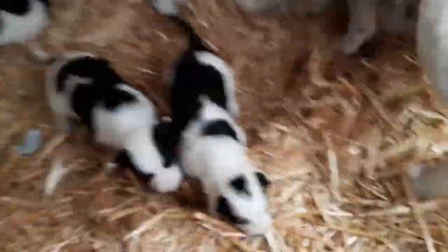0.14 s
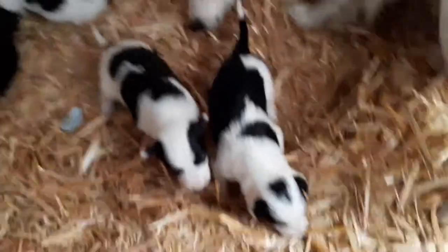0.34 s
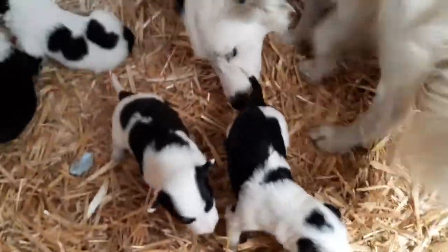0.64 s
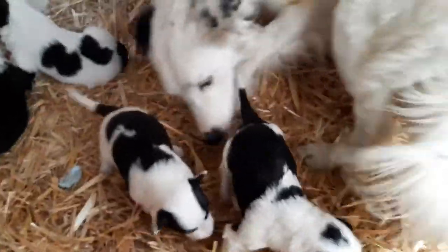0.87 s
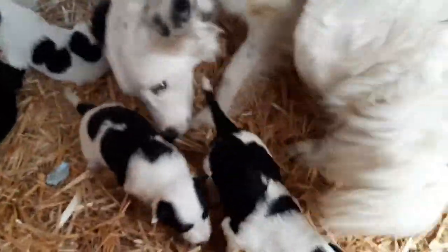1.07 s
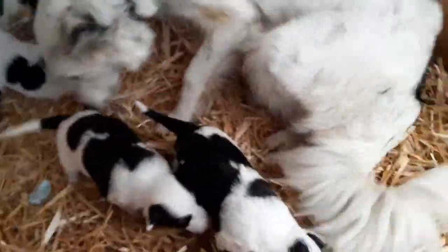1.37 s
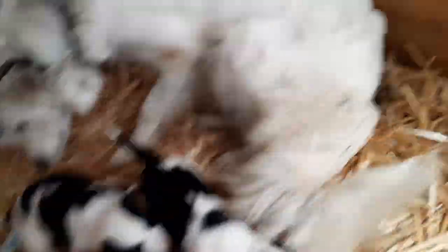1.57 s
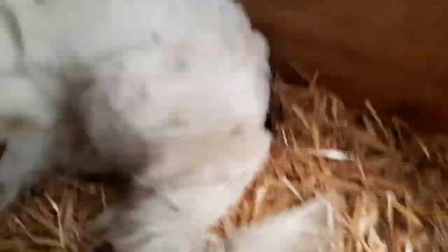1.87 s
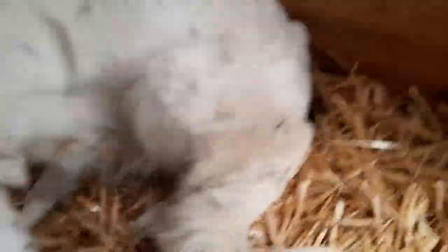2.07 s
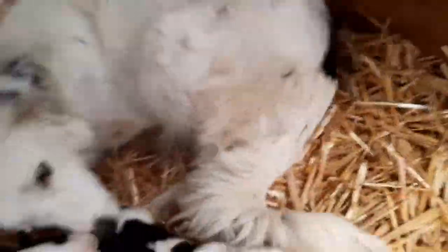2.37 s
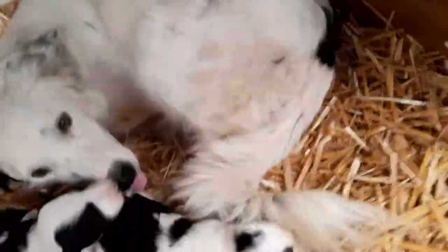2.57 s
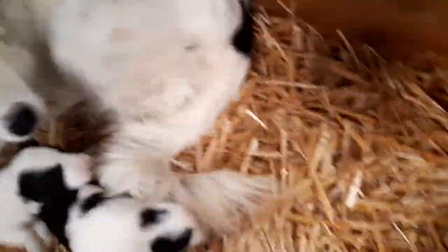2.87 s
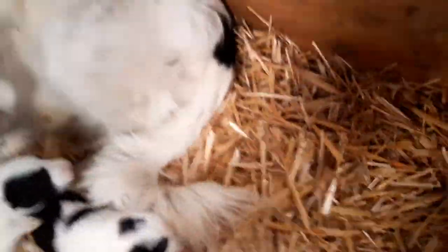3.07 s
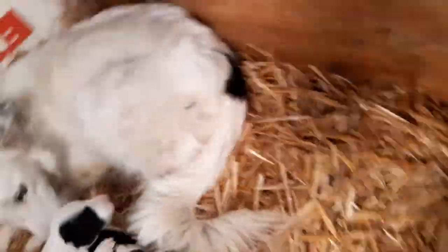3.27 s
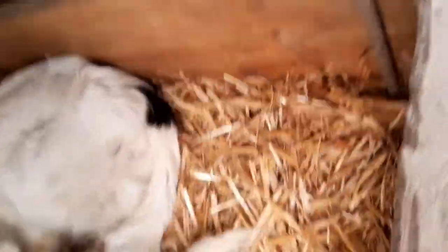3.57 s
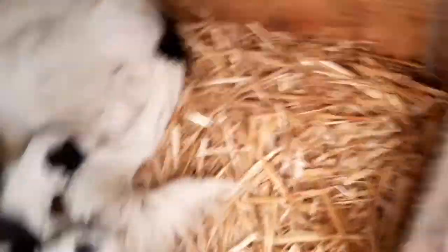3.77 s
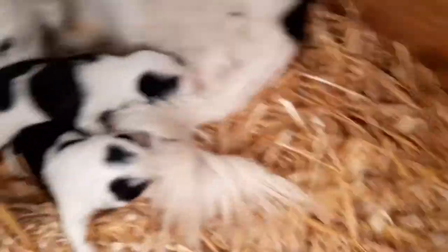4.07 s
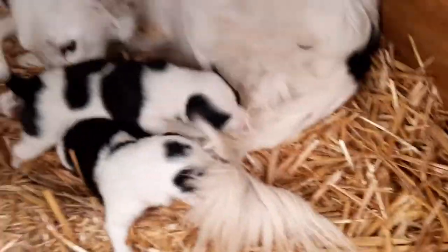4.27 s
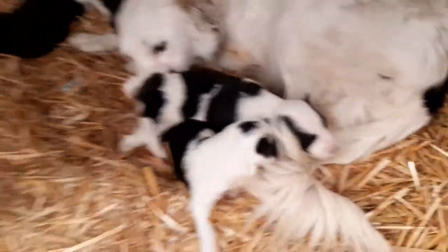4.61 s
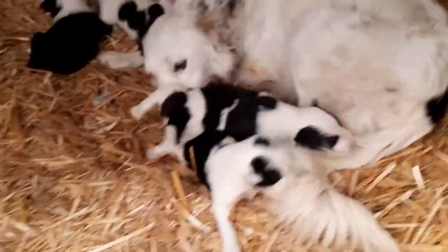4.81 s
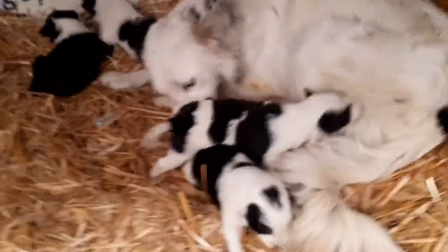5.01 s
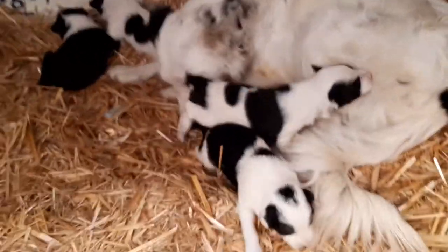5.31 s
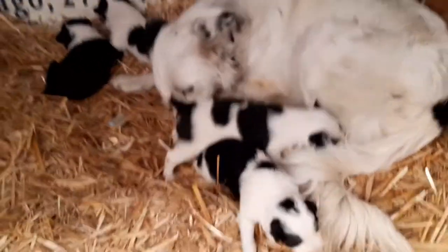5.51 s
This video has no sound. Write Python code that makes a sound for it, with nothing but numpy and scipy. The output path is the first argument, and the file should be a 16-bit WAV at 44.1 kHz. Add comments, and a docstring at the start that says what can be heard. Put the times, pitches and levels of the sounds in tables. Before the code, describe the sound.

Young puppies squeal and whimper close by in rustling straw, with a sharp stalk snap and one very loud knock on a plank wall.

```python
"""Newborn puppies in a straw pen

Puppies squeal and whimper close by: partials on wavering pitch arches; their mother adds thin gliding whistles.
Straw rustles and scuffs as shaped noise with crackles; stalks snap as short ticks. Peaked noise bursts make
shoves through the straw and two faint breathy squeaks. A tub is bumped and the plank wall knocked: decaying
modes with a noise crack. Shaped low noise makes the barn rumble and the boards drum. The pen returns short
echoes; two microphone ports hear it all in stereo."""
import sys
import numpy as np
from scipy import signal
from scipy.fft import rfft, irfft, next_fast_len
from scipy.io import wavfile
from scipy.ndimage import uniform_filter1d

SR = 44100
rng = np.random.default_rng(int(sys.argv[2]) if len(sys.argv) > 2 else 0)


def waveform_to_disk(signal):
    """Save audio, clipped to [-1, 1], as 16-bit WAV at the path in sys.argv[1]."""
    frames = np.transpose(np.atleast_2d(signal))
    scaled = np.clip(frames, -1, 1) * 32767
    samples = np.round(scaled).astype(np.int16)
    wavfile.write(sys.argv[1], SR, samples)


N = 249165  # length in samples

# colour of scuffing straw, also the base of the noise bursts: freq_hz, relative density_db_per_hz
SCUFF_COLOUR = [(71, -62.5), (120, -6.5), (682, -6), (754, -4), (852, -4.5), (2690, -8.5), (5690, -16),
                (7250, -21.5), (15000, -37)]


def gain_of(db):
    """Amplitude factor of a level in dB."""
    return 10 ** (np.asarray(db) / 20)


def evened(x):
    """Scale to an RMS of 1."""
    return x / np.sqrt(np.mean(x ** 2) + 1e-20)


def read(points, hz):
    """Read a curve of (Hz, value) points, straight over log frequency."""
    f, value = np.transpose(points)
    return np.interp(np.log(hz + 1), np.log(f + 1), value)


def add(mix, start_s, sound):
    """Mix a sound in at its start time, cut at the end of the scene."""
    part = mix[:, round(start_s * SR):][:, :sound.shape[-1]]
    part += sound[..., :part.shape[1]]


def over_time(rows, t):
    """Glide straight between timed rows, one curve per column."""
    start_s, *columns = np.transpose(rows)
    return [np.interp(t, start_s, column) for column in columns]


def noise(spectrum, patchy_db, flicker_db, size):
    """Stereo noise from random short-time spectra, with patches and a flicker shared by all bands."""
    # left-right likeness: freq_hz, likeness (1 = identical ports)
    likeness = [(60, 0.93), (240, 0.92), (950, 0.25), (3770, 0.015), (15000, 0.02)]
    frames = 4 * N // size + 5
    hz = np.fft.rfftfreq(size, 1 / SR)
    hz = hz[hz <= spectrum[-1][0]]
    a, b, c, d, patches = rng.standard_normal((frames, len(hz), 5)).T
    patches = uniform_filter1d(patches, size=6, axis=0)
    patches = evened(uniform_filter1d(patches, size=12, axis=1))
    flicker = evened(uniform_filter1d(rng.standard_normal(frames), size=3))
    same = np.clip(read(likeness, hz), 0, 1)[:, None]
    left = a + 1j * b
    right = same * left + np.sqrt(1 - same ** 2) * (c + 1j * d)
    level_db = read(spectrum, hz)[:, None] + patchy_db * patches + flicker_db * flicker
    bins = np.array([left, right]) * gain_of(level_db)
    return evened(signal.istft(bins, nfft=size, nperseg=size, noverlap=size * 3 // 4)[1][:, :N])


def straw():
    """A fine rustle over the whole bed, pricked by small crackles, and a duller scuffing of bodies."""
    # colour of the fine rustle: freq_hz, relative density_db_per_hz
    rustle_colour = [(240, -42), (400, -9.5), (562, -25), (839, -6.5), (1220, -8), (4580, 0), (8500, -4),
                     (14800, -3), (16000, -5.5)]
    # straw between movements: time_s, rustle_db (before crackles), scuff_db
    bed = [(0.0, -72, -56), (0.8, -53, -64.5), (1.4, -48, -67), (2.0, -49.5, -56.5), (2.7, -45.5, -57.5),
           (3.1, -52, -53.5), (3.6, -52.5, -60.5), (4.0, -52.5, -52.5), (4.2, -61.5, -67),
           (4.5, -62, -67.5), (5.0, -64, -61.5), (5.3, -59, -69), (5.65, -63, -61)]
    # a dog stirs: peak_s, rise_s, fall_s (each 10 dB of change), rustle_db (before crackles), scuff_db
    stirs = [(0.015, 0.036, 0.13, -33, -64), (0.119, 0.026, 0.26, -38.5, -47.5),
             (0.51, 0.12, 0.046, -39.5, -53.5), (0.67, 0.097, 0.087, -38.5, -57),
             (0.87, 0.028, 0.074, -45, -76), (0.992, 0.051, 0.27, -38.5, -53),
             (1.191, .02, 0.026, -33.5, -48), (1.5, 0.26, 0.36, -38, -49), (1.922, 0.083, 0.075, -35, -41),
             (2.09, 0.023, 0.1, -38.5, -67), (2.3, 0.27, 0.13, -37, -47.5), (2.8, 0.049, 0.096, -48, -62),
             (3.26, 0.14, 0.028, -43.5, -49), (3.76, 0.045, 0.053, -44.5, -63),
             (4.075, 0.031, 0.035, -53, -46.5), (4.135, .015, 0.015, -53, -62),
             (4.37, 0.15, 0.066, -49, -54.5), (4.545, 0.0092, .02, -56.5, -66),
             (4.62, .015, 0.013, -54, -70), (4.72, .03, 0.022, -55.5, -69), (4.99, .01, 0.022, -55, -62),
             (5.33, 0.23, .1, -52, -66), (5.475, .01, 0.018, -54.5, -74), (5.55, 0.045, 0.15, -44.5, -47.5)]
    t = np.arange(N) / SR
    power = gain_of(over_time(bed, t)) ** 2
    for peak_s, rise_s, fall_s, *peaks_db in stirs:
        away = np.maximum((peak_s - t) / abs(rise_s), (t - peak_s) / abs(fall_s))
        power += gain_of(peaks_db)[:, None] ** 2 * 10 ** -away
    rustle, scuff = np.sqrt(power)
    # about 40 pricks a second
    pricks = np.minimum(rng.exponential(1, N), 3) * (rng.random(N) < 40 / SR)
    crackle = 1 + 15.0 * uniform_filter1d(pricks, size=40)
    fine = rustle * crackle * noise(rustle_colour, 1.4, 1.17, size=256)
    return fine + scuff * noise(SCUFF_COLOUR, 2.1, 1.8, size=512)


def barn():
    """Low rumble and the boards drumming under shifting weight, as two bands of noise."""
    # low levels: time_s, rumble_db, boards_db
    lows = [(0.0, -42, -55.5), (0.63, -45, -66), (2.14, -42, -46.5), (2.71, -50, -70), (3.62, -49.5, -68),
            (3.86, -44, -57), (4.44, -54.5, -74), (5.65, -50.5, -71)]
    # colour of the barn rumble: freq_hz, relative density_db_per_hz
    rumble_colour = [(13, -58.5), (22, -41.5), (29, -14), (40, -39), (70, 15.5), (87, -1), (135, -11.5),
                     (171, -8.5), (220, -22.5), (290, -64.5), (480, -120)]
    # colour of the drumming floorboards: freq_hz, relative density_db_per_hz
    boards_colour = [(150, -11.5), (220, -3), (300, 18.5), (370, 2), (460, -56.5)]
    rumble_db, boards_db = over_time(lows, np.arange(N) / SR)
    rumble = gain_of(rumble_db) * noise(rumble_colour, 2.9, 0.49, size=2048)
    return rumble + gain_of(boards_db) * noise(boards_colour, 0.8, 1.17, size=1024)


def knock(modes, ring_db, crack_db):
    """A dull noise crack, while the struck thing's modes swell and ring."""
    t = np.arange(SR // 2) / SR
    ring = 0
    for hz, mode_db, t60_s in modes:
        swell = 1 - np.exp(-t * hz / 0.5)  # time constant: half a cycle
        ring = ring + gain_of(mode_db - 60 * t / t60_s) * np.sin(2 * np.pi * hz * t) * swell
    decay = np.exp(-t / 0.00075) + 0.22 * np.exp(-t / 0.013)
    crack = decay * rng.standard_normal((2, len(t)))
    band = signal.butter(3, [600, 2300], "bandpass", fs=SR, output="sos")
    crack = signal.sosfilt(band, crack + crack[0])  # the ports share part of the crack
    return gain_of(ring_db) * ring + gain_of(crack_db) * crack / abs(crack).max()


def knocks():
    """Bumps excite the tub's modes, blows those of the plank wall."""
    # modes of a plastic tub: freq_hz, relative level_db, t60_s
    tub = [(87.2, -4.5, 0.3), (172, -2, 0.081), (307, -1, 0.11), (336.3, -0.5, 0.095), (620, -3, 0.0335),
           (797, -24.5, 0.08)]
    # bumps against the tub: start_s, ring_db, crack_peak_db
    bumps = [(0.155, -18, -53), (.163, -18.5, -34), (.18, -13, -28), (.195, -17, -44), (.218, -33.5, -60)]
    # modes of the plank wall: freq_hz, relative level_db, t60_s
    wall = [(75.6, -21.5, 0.64), (175.8, 3.5, 0.065), (168.6, -9, 0.23), (302, -8, 0.087),
            (446, -20, 0.058), (636, -5, 0.027), (850, -11, 0.022), (1190, -2, 0.0077)]
    # blows on the wall: start_s, ring_db, crack_peak_db
    blows = [(3.785, -0.5, -11), (3.815, -29, -27), (5.041, -42, -48), (5.528, -48, -34)]
    hits = np.zeros((2, N))
    for modes, strikes in ((tub, bumps), (wall, blows)):
        for start_s, *strike in strikes:
            add(hits, start_s, knock(modes, *strike))
    return hits


def pen(x):
    """Short scattered echoes of the plank walls, different at each port."""
    t = np.arange(6000) / SR
    taps = rng.standard_normal((2, len(t))) * gain_of(-60 * t / 0.14) * (t > .004)
    return signal.fftconvolve(x, taps / np.linalg.norm(taps[0]), axes=1)[:, :N]


def tone(hz, levels_db, wobble):
    """Partials on one wavering pitch; the two ports hear each at a different phase."""
    # phase between the ports for the voices: freq_hz, left_lead_rad (limited below to 2.2 either way)
    port_turn = [(700, 3), (1300, -1.5), (2200, 2), (4000, -0.06), (6000, 1.6)]
    waver = evened(uniform_filter1d(rng.standard_normal(len(hz)), size=200))
    turns = np.cumsum(hz * (1 + wobble * waver)) / SR
    sound = np.zeros((2, len(hz)))
    for k, level_db in enumerate(levels_db, 1):
        half = np.clip(read(port_turn, k * hz) / 2, -1.1, 1.1)
        # each partial swells and fades on its own, the high ones more
        patchy = uniform_filter1d(rng.standard_normal(len(hz)), size=300)
        patchy = evened(uniform_filter1d(patchy, size=150))
        level_db = level_db + (3.6 + .3 * k) * patchy
        partial = np.cos(2 * np.pi * k * turns + [half, -half])
        sound += gain_of(level_db) * partial / np.cos(half)  # the mid signal keeps its level
    return np.sqrt(2) * sound * signal.windows.tukey(len(hz), .15)


def arch(length_s, start_hz, top_hz, end_hz, share, rise_bend, fall_bend):
    """Effort rises to one top and falls away; the pitch follows it, more pointed for a higher bend."""
    u = np.arange(0, length_s, 1 / SR) / length_s
    nearness = np.minimum(u / share, (1 - u) / (1 - share))
    effort = np.sin(np.pi / 2 * np.clip(nearness, 0, 1))
    low_hz, bend = np.where(u < share, [[start_hz], [rise_bend]], [[end_hz], [fall_bend]])
    return effort, low_hz + (top_hz - low_hz) * effort ** bend


def squeal(length_s, start_hz, top_hz, end_hz, share, *tops_db):
    """Five partials; the high ones flare only while the mouth is wide open."""
    # how far partials 1 to 5 sink as the mouth shuts: sink_db
    sinks_db = [10.4, 17.4, 56, 30, 21]
    mouth_lag_s = 0.0053  # the mouth opens a little after the effort
    effort, hz = arch(length_s, start_hz, top_hz, end_hz, share, rise_bend=1.5, fall_bend=1.2)
    t = np.arange(len(hz)) / SR
    shut = 1 - np.interp(t - mouth_lag_s, t, effort) ** 2.6
    return tone(hz, [top_db - sink_db * shut for top_db, sink_db in zip(tops_db, sinks_db)], wobble=.008)


def snap(peak_db, hz):
    """A stalk snaps: a sharp two-tone tick, then the pen's scattered echoes a few milliseconds later."""
    t = np.arange(3000) / SR
    tones = np.cos(2 * np.pi * hz * t) - 0.8 * np.cos(2 * np.pi * 1.86 * hz * t)
    tick = np.exp(-t / 0.00047) * (tones + .15 * rng.standard_normal(len(t)))
    echoes = 0.5 * np.exp(-t / 0.0086) * (t > .0028) * rng.standard_normal((2, len(t)))
    band = signal.butter(2, [hz * .65, min(hz * 2.6, 18000)], "bandpass", fs=SR)
    return gain_of(peak_db) * (tick / abs(tick).max() + signal.lfilter(*band, echoes))


def whimper(length_s, start_hz, top_hz, end_hz, share, bend, effort_db, overtone_db):
    """Two partials through the nose, its colour following their pitch."""
    # colour of the nose with the mouth shut: freq_hz, gain_db
    nose = [(700, -4), (830, 0.5), (1000, -4), (1250, -5), (1650, -8), (1850, -5), (2000, -20), (2200, -23)]
    swell_db = 11  # the top over the ends
    effort, hz = arch(length_s, start_hz, top_hz, end_hz, min(share, .95), bend, bend)
    level_db = effort_db - swell_db * (1 - effort) ** 2
    levels_db = [level_db + read(nose, hz), level_db + overtone_db + read(nose, 2 * hz)]
    return tone(hz, levels_db, wobble=.016)


def noise_burst(rise_s, hold_s, fall_s, level_db, tilt_db, peak_hz):
    """A burst of spiky noise with one spectral peak: stalks crushed by a shove, or a faint breathy squeak."""
    t = np.arange(round((rise_s + hold_s + 3 * fall_s) * SR)) / SR
    shape = np.clip(t / rise_s, 0, 1) * np.exp(-np.maximum(t - rise_s - hold_s, 0) / fall_s * 2)
    spikes_db = 2.1 * np.minimum(rng.exponential(1, (3, len(t))), 4)
    shared, *own = rng.standard_normal((3, len(t))) * gain_of(spikes_db)
    hz = np.fft.rfftfreq(len(t), 1 / SR)
    colour = gain_of(read(SCUFF_COLOUR, hz) + tilt_db * np.log2(hz / 1000 + 0.063))
    colour *= 1 + 2.6 / (1 + ((hz - peak_hz) / 130) ** 2)  # narrow peak
    lumps = gain_of(2.1 * evened(uniform_filter1d(rng.standard_normal(len(t)), size=200)))
    grain = evened(irfft(rfft(shared + 0.92 * np.array(own)) * colour, len(t)))
    return gain_of(level_db) * shape * lumps * grain


def whistle(length_s, start_hz, settled_hz, glide_s, level_db):
    """One thin tone that glides towards its settled pitch, softer at both ends."""
    t = np.arange(0, length_s, 1 / SR)
    hz = settled_hz + (start_hz - settled_hz) / (1 + t / glide_s) ** 2
    return tone(hz, [level_db - 4 * (2 * t / length_s - 1) ** 2], wobble=.006)


def cries():
    """The pups' squeals and whimpers and the mother's whistles, each placed in time."""
    # open-mouthed squeals: start_s, length_s, start_hz, top_hz, end_hz, share of the cry before the top,
    # then the levels of partials 1 to 5 at the top: top1_db to top5_db (before their random swells)
    squeals = [(0.185, 0.17, 845, 1240, 695, 0.26, -43.5, -41.5, -53, -50.5, -47.5),
               (0.565, 0.22, 834, 1408, 906, 0.26, -42.5, -40, -35, -40.5, -50.5),
               (0.975, 0.225, 980, 1269, 850, 0.3, -41, -33, -51, -47.5, -55),
               (1.225, 0.132, 1335, 1303, 1275, 0.18, -71, -58, -48.5, -72, -70)]
    # closed-mouth whimpers: start_s, length_s, start_hz, top_hz, end_hz, share before the top (0.95 at most),
    # pointedness of the arch, effort_db (before the nose colour), overtone_db (over the first partial)
    whimpers = [(1.585, 0.093, 870, 961, 953, 0.597, 4.6, -48.5, 5.5),
                (2.01, 0.15, 766, 990, 723, 0.6, 2.82, -43, 1),
                (2.36, 0.19, 762, 1096, 730, 0.53, 2.3, -39.5, -1.5),
                (2.735, 0.12, 725, 830, 760, 0.77, 1.73, -47, 0.5),
                (3.05, 0.083, 696, 714, 725, 0.4, 1.7, -47, -13),
                (3.91, 0.16, 702, 1298, 780, 0.41, 1.3, -48, -6),
                (4.485, 0.05, 573, 588, 570, 0.58, 1.5, -65.5, -14),
                (4.93, 0.099, 697, 853, 754, 0.57, 0.86, -47.5, -4),
                (5.21, 0.082, 683, 711, 715, 0.97, 1.6, -54.5, -5)]
    # thin nasal whistles of the mother: start_s, length_s, start_hz, settled_hz,
    # glide_s (a quarter of the way left), level_db (at mid-length, before its random swells)
    whistles = [(4.645, 0.05, 3960, 4100, 0.04, -70), (4.71, 0.045, 11860, 11930, 0.03, -64),
                (4.8, 0.04, 3150, 3360, 0.015, -63), (5.06, 0.085, 6500, 9150, 0.025, -70),
                (5.255, 0.25, 7400, 4270, 0.078, -60)]
    voices = np.zeros((2, N))
    for calls, voice in ((squeals, squeal), (whimpers, whimper), (whistles, whistle)):
        for start_s, *call in calls:
            add(voices, start_s, voice(*call))
    return voices


def scene():
    """Voices and knocks with their pen echoes, then snaps, noise bursts, straw and barn."""
    # snapping stalks: start_s, tick peak_db, pitch_hz (of the lower tone)
    snaps = [(0.9805, -28.5, 2270), (2.5509, -10, 2360), (3.018, -31.5, 4320), (3.2103, -27.5, 2200),
             (3.2584, -33, 980), (4.0726, -33, 6500), (4.7714, -41, 4470), (4.8448, -25.5, 4200),
             (4.984, -43, 1640), (5.634, -36, 7000)]
    # noise bursts: start_s, rise_s, hold_s, fall_s (about 17 dB of decay),
    # level_db (at full shape, before lumps), tilt_db_per_octave, peak_hz.
    # The rows at 2.602 and 3.517 s are faint breathy squeaks near 3.5 kHz, made as narrow noise bursts;
    # the others are paws and bodies shoved through straw, the peak being the hollow of the bed.
    bursts = [(2.602, 0.014, .03, .02, -52, 4, 3450), (3.517, 0.016, 0.054, 0.026, -55.5, 4, 3670),
              (3.237, 0.02, 0.02, 0.021, -46.5, 5.5, 950), (4.695, 0.028, 0.014, 0.021, -42.5, -1.8, 600),
              (4.84, 0.004, 0.038, 0.024, -38.5, 1.3, 300), (5.269, 0.021, 0.045, 0.015, -46, -1, 775),
              (5.325, 0.021, 0.032, 0.014, -40, -0.5, 830), (5.515, 0.0059, 0.076, .03, -48, -2, 607)]
    voices, hits = cries(), knocks()
    near = voices + gain_of(-5) * pen(voices)
    near += hits + gain_of(-12.0) * pen(hits)
    for start_s, *stalk in snaps:
        add(near, start_s, snap(*stalk))
    for start_s, *burst in bursts:
        add(near, start_s, noise_burst(*burst))
    return near + straw() + barn()


def record(dry):
    """The two ports lean left or right by pitch and drop the deepest bass; then soft overload and band limit."""
    # microphone ports: freq_hz, left_minus_right_db
    lean = [(60, 2), (180, 2.5), (550, 5), (1650, 3), (4970, 0.5), (15000, 5)]
    edge_hz = 15950  # top of the band
    size = next_fast_len(N + 4096)
    lean_db = read(lean, np.fft.rfftfreq(size, 1 / SR)) / 2
    dry = signal.sosfilt(signal.butter(3, 52, "highpass", fs=SR, output="sos"), dry)
    heard = irfft(rfft(dry, size) * gain_of([lean_db, -lean_db]), size)[:, :N]
    heard /= (1 + heard ** 6) ** (1 / 6)  # the loudest blow overloads softly
    lowpass = signal.firwin(511, edge_hz, window=("kaiser", 9), fs=SR)
    return signal.oaconvolve(heard, lowpass[None], "same")


dry = scene()
out = record(dry)
waveform_to_disk(out)
```